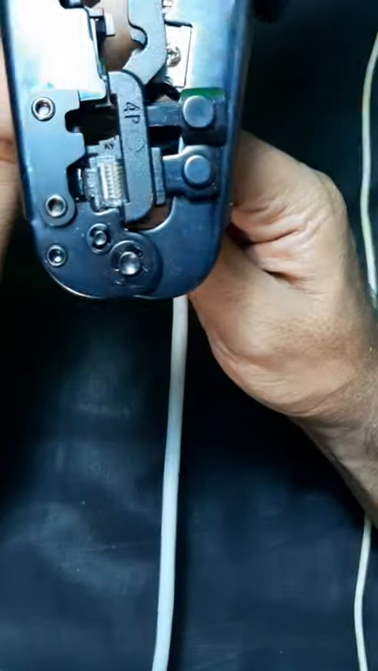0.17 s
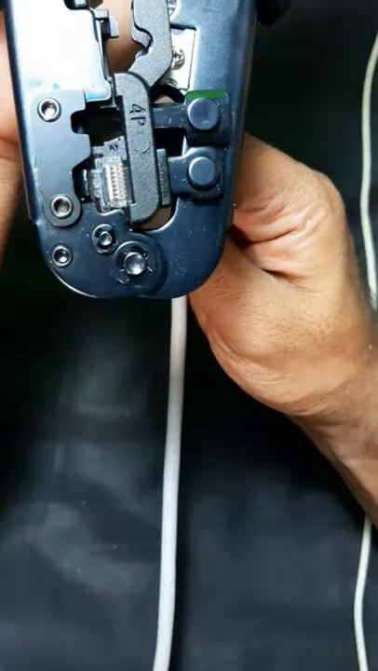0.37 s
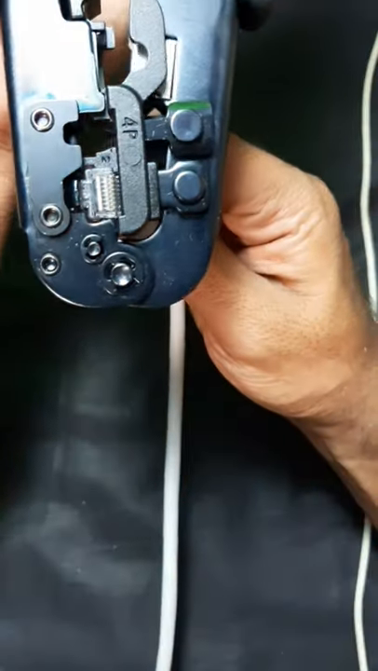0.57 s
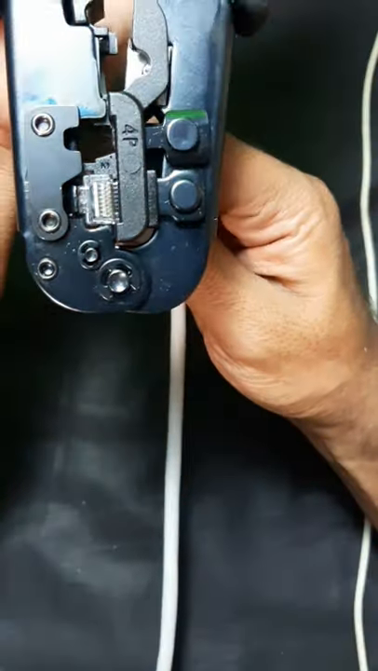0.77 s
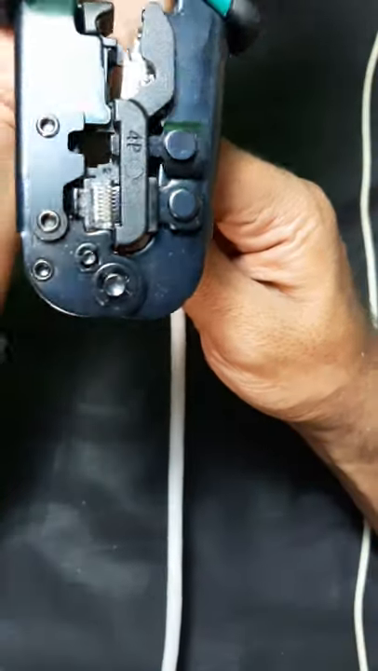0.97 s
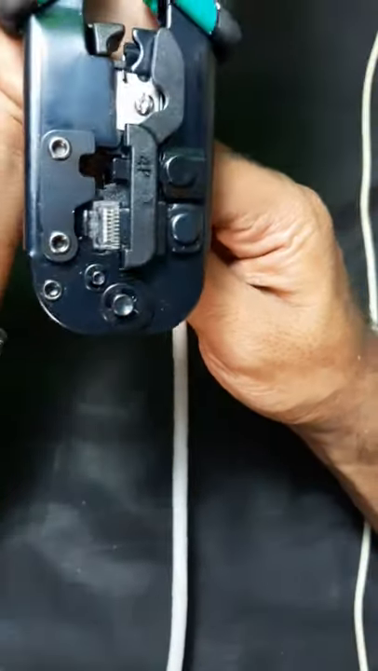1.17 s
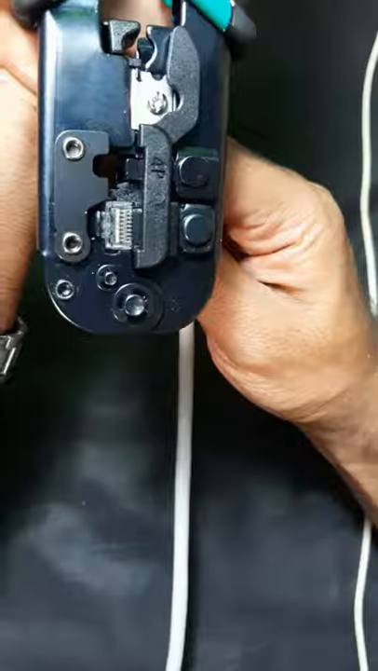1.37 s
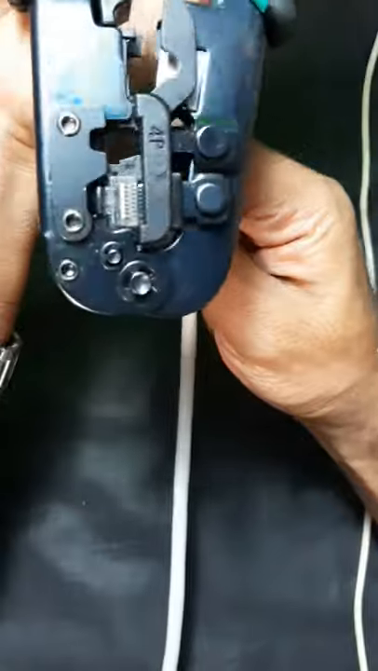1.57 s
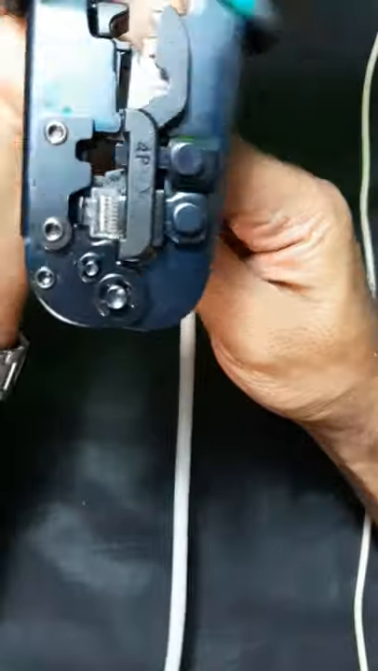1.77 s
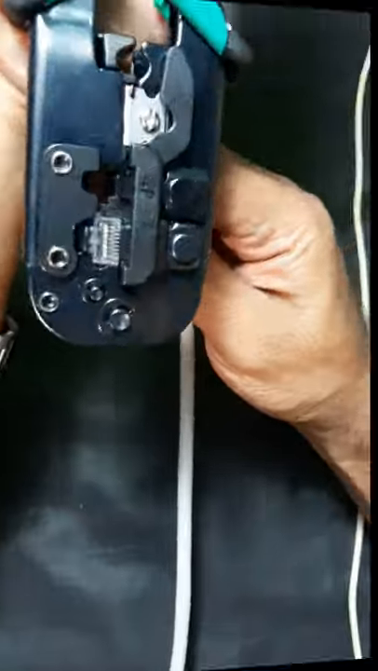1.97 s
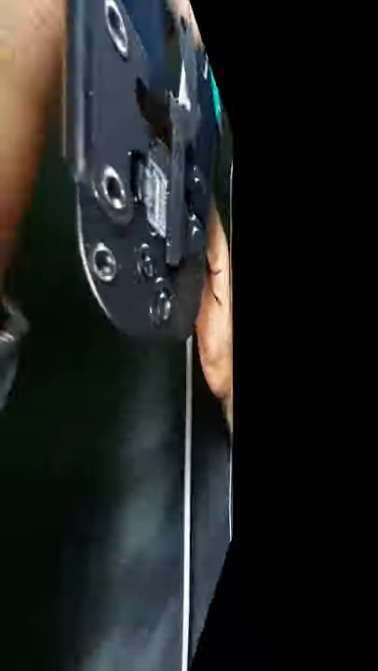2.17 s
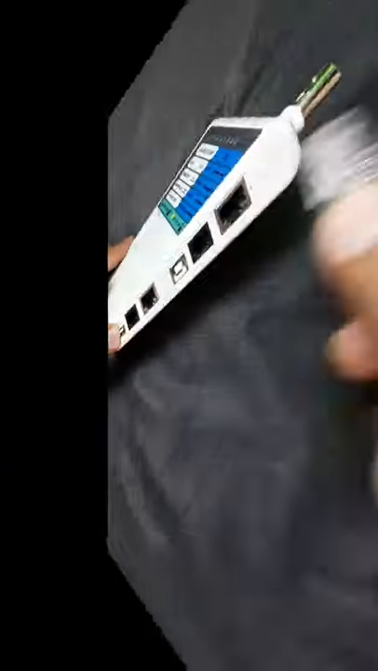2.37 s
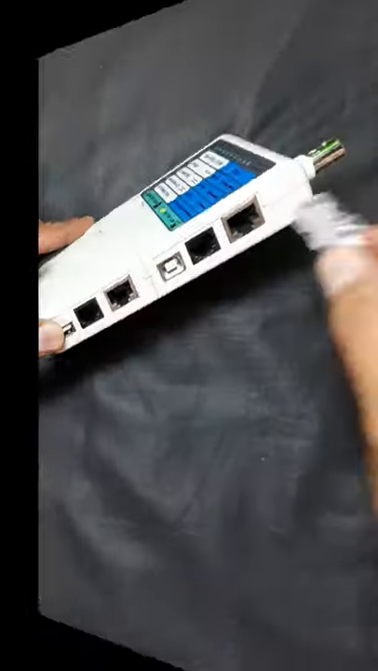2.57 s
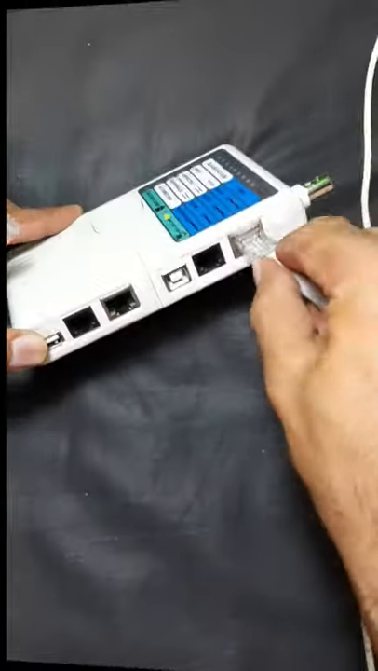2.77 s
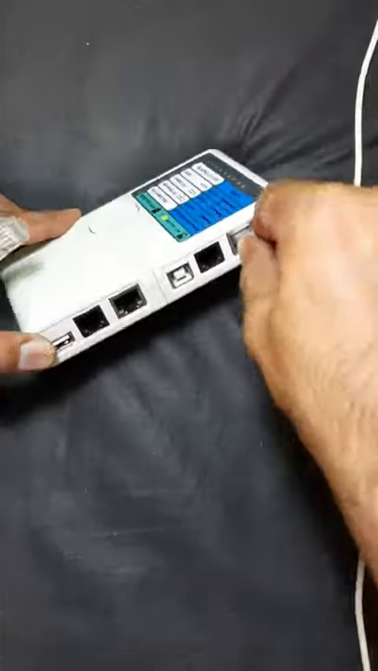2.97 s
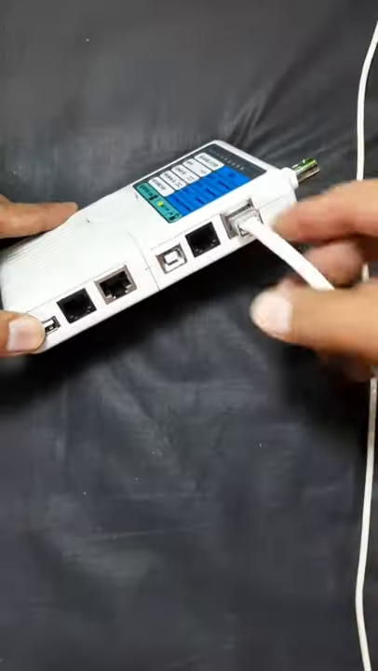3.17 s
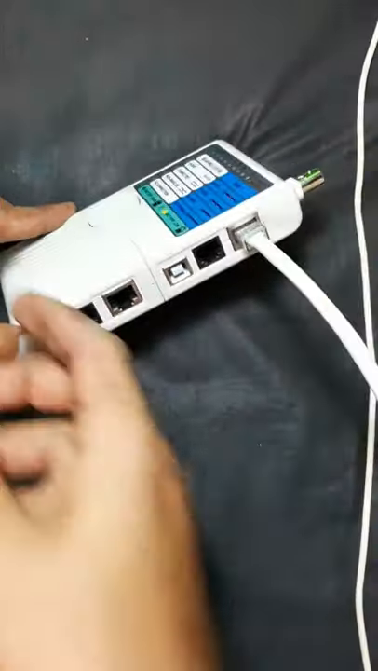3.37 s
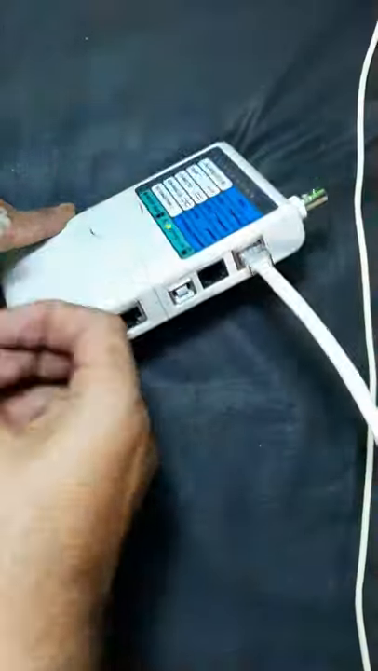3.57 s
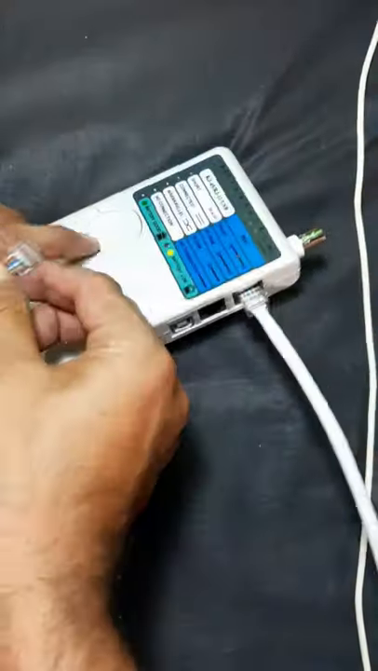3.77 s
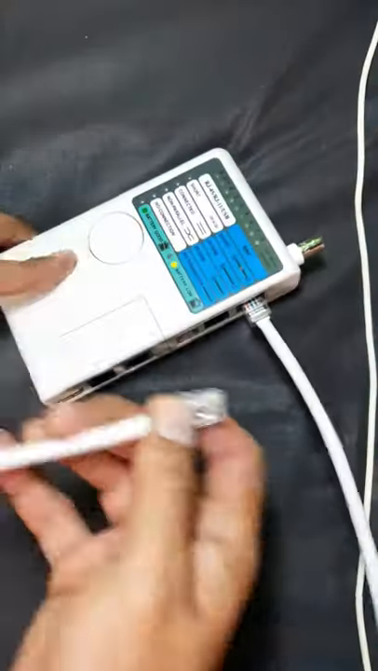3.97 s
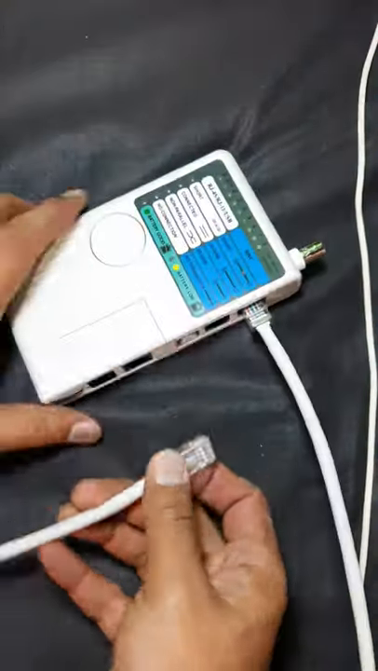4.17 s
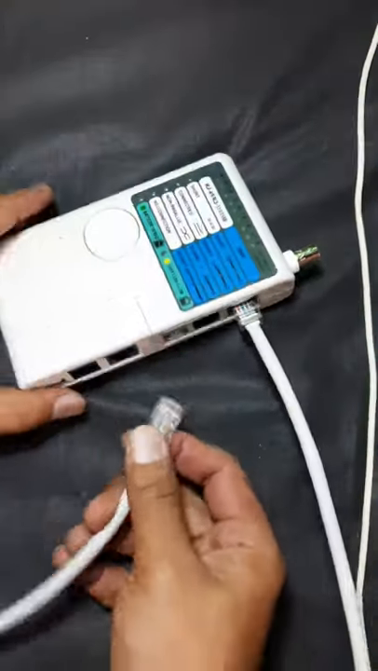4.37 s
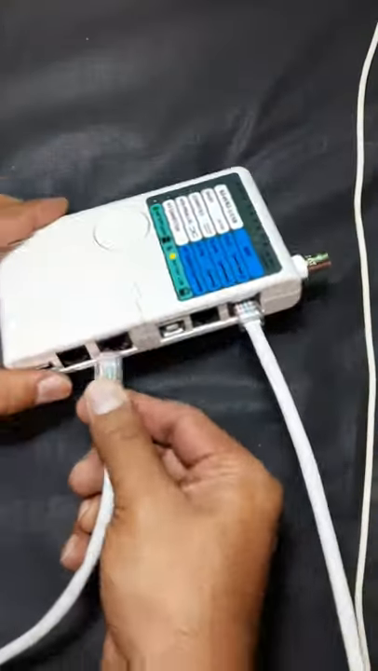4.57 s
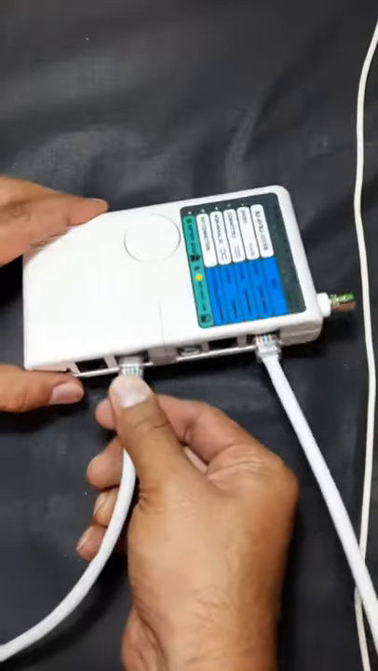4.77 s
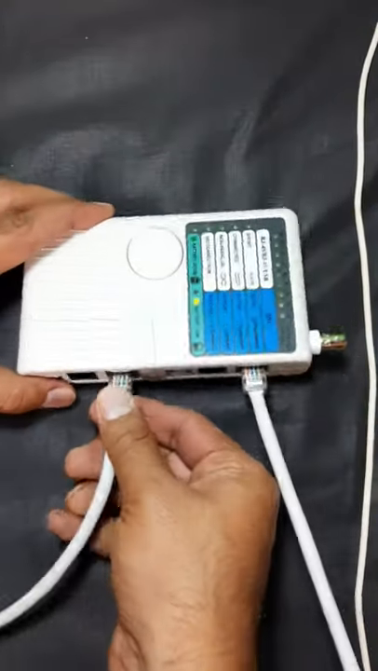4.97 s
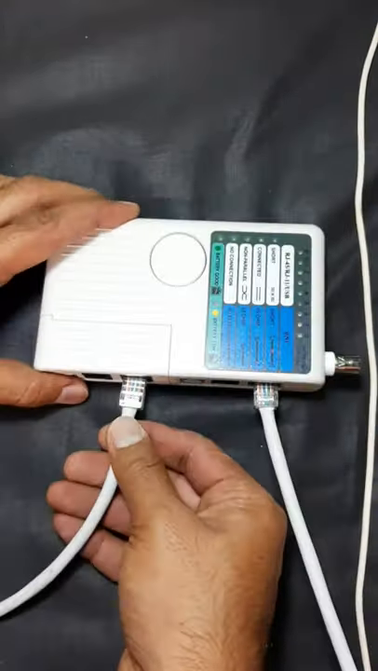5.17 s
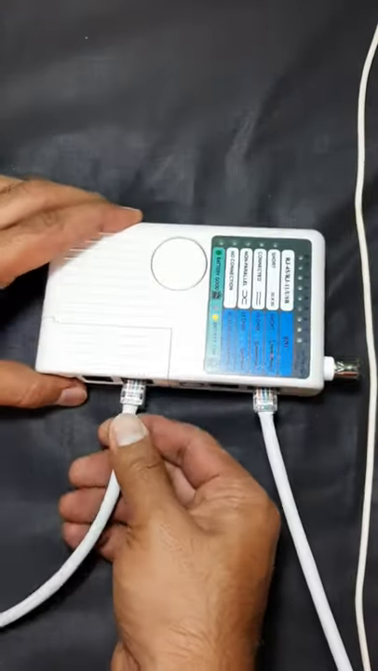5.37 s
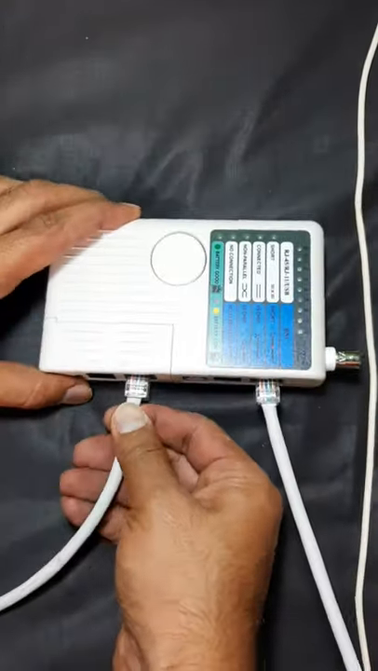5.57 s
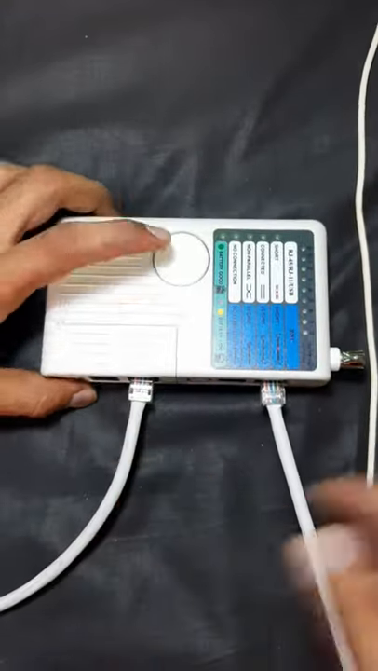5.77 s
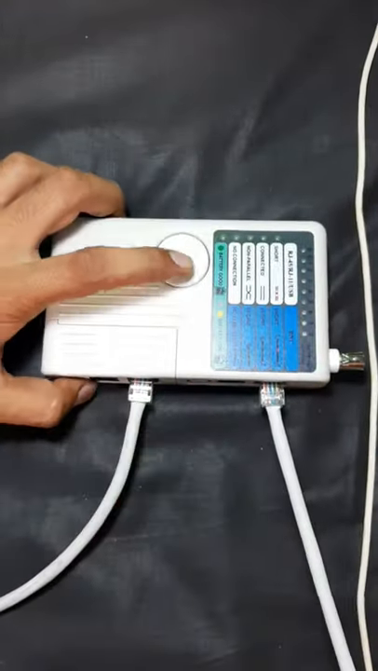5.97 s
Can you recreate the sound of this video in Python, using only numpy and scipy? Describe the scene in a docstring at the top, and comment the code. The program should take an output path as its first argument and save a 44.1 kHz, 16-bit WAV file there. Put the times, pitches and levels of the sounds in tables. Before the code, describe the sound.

Close up in a small room, an unsteady low fan hum and soft draught run underneath. A steel ratchet tool is squeezed and released with bright, crisp clicks in three tight bursts and faint gritty rubs. Everything fades briefly to silence, then returns with plastic plugs snapping into a hollow tester, light sliding and tiny taps, ending on one small click as the fan grows quieter.

```python
"""Crimping a network plug, then testing it

A fan hums unevenly and grows quieter towards the end: wavering tones over coloured noise.
A ratchet crimping tool is squeezed and let go: noise bursts ring steel modes. The sound fades briefly to
silence and back; plugs slide into a plastic tester and latch, ringing plastic modes. Rubs are swelling
friction noise, thuds are damped sines; a small room answers the clicks and thuds."""
import sys
import numpy as np
from scipy import signal
from scipy.fft import rfft, irfft
from scipy.io import wavfile
from scipy.ndimage import uniform_filter1d

SR = 44100
rng = np.random.default_rng(int(sys.argv[2]) if len(sys.argv) > 2 else 0)


def dump(signal):
    """Clip the signal to [-1, 1] and save it as 16-bit WAV at the path in sys.argv[1]."""
    limited = np.clip(np.atleast_2d(signal).T, -1, 1)
    pcm = np.round(limited * 32767).astype(np.int16)
    wavfile.write(sys.argv[1], SR, pcm)


N = 265923
TIME = np.arange(N) / SR
SILENT_S = 2.3404  # middle of the fade; tool before, tester after


def amp(db):
    """Decibels to gain."""
    return 10 ** (np.asarray(db) / 20)


def unit(x):
    """Scales to an rms of one."""
    return x / np.sqrt(np.mean(x ** 2) + 1e-24)


def unit_blow(x):
    """Scales each channel to the energy of 10 ms at an rms of one."""
    energy = (x ** 2).sum(-1, keepdims=True)
    return x / np.sqrt(energy / (SR / 100))


def read(points, hz):
    """Reads a table along a logarithmic frequency axis."""
    point_hz, value = np.transpose(points)
    return np.interp(np.log(hz + 1), np.log(point_hz), value)


def add(mix, start_s, sound):
    """Adds a stereo sound at a time."""
    part = mix[:, max(round(start_s * SR), 0):][:, :sound.shape[1]]
    part += sound[:, :part.shape[1]]


def band(x, lo_hz, hi_hz, order=3):
    """Causal Butterworth band-pass."""
    sos = signal.butter(order, [lo_hz, min(hi_hz, SR * .48)], "band", fs=SR, output="sos")
    return signal.sosfilt(sos, x)


def wander(rate_hz):
    """Low-passed noise of unit rms."""
    hz = np.fft.rfftfreq(N, 1 / SR)
    spectrum = rfft(rng.standard_normal(N)) / (1 + (hz / rate_hz) ** 4)
    return unit(irfft(spectrum, N))


def panned(pan_db):
    """Left and right gains of constant power, pan_db apart."""
    return unit(amp([[pan_db / 2], [-pan_db / 2]]))


def ring(x, modes):
    """Direct sound plus damped modes (pitch_hz, width_hz, gain_db), which radiate little below their pitch."""
    hz = np.fft.rfftfreq(x.shape[-1], 1 / SR)
    body = 1
    for pitch_hz, width_hz, gain_db in modes:
        radiation = np.minimum(hz / pitch_hz, 1) ** 2
        resonance = 1 / (1 + 2j * (hz - pitch_hz) / width_hz)
        body = body + amp(gain_db) * radiation * resonance
    return irfft(rfft(x) * body, x.shape[-1])


# fan throb pitch before waver: start_s, pitch_hz
THROB_PITCH = [(0, 47.85), (1.1, 45.81), (1.45, 50.08), (2.05, 45.7), (2.6, 52.08), (3.3, 50.2),
               (3.7, 45.25), (4.6, 47.4), (5.2, 44.16), (5.7, 47.98)]
# throb before trim and flutter, one list for the tool and one for the tester: start_s, level_db
THROB_CURVES = [
    [(0.0, -49), (0.05, -37.5), (0.15, -56), (0.23, -51.5), (0.58, -42.5), (0.62, -60), (0.73, -39),
     (0.89, -58), (1.02, -40.5), (1.11, -65), (1.18, -46.5), (1.84, -55), (1.87, -71), (1.98, -42),
     (2.04, -51.5), (2.15, -60.5)],
    [(2.6, -62.5), (3.04, -40), (3.22, -54), (3.61, -45.5), (3.69, -57), (3.86, -43.5), (4.02, -61),
     (4.43, -48.5), (4.55, -57), (4.63, -50.5), (5.35, -58), (5.39, -77), (5.51, -54.5), (5.71, -68.5),
     (5.89, -59.5), (6.0, -73)],
]
# its octave, likewise: start_s, level_db
OCTAVE_CURVES = [
    [(0.0, -54), (0.11, -47.5), (0.3, -46), (0.33, -58), (0.36, -52), (0.92, -49), (0.95, -49.5),
     (1.04, -43), (1.09, -65), (1.24, -46), (1.33, -59), (2.15, -54)],
    [(2.6, -63.5), (3.11, -54.5), (3.5, -56.5), (3.53, -67.5), (3.57, -44), (3.84, -61.5), (3.86, -54),
     (5.04, -56.5), (5.08, -82), (5.13, -61), (5.96, -71.5), (6.0, -64)],
]


def hum(waver_hz=2.6, flutter_db=2.0, waver_rate_hz=9, flutter_rate_hz=9, pan_db=0.89):
    """Fan blades chop the air: a low tone and its octave, both unsteady in pitch, wavering unevenly in level."""
    throb_trim_db, octave_trim_db = 0, -1
    tones = [(1, THROB_CURVES, throb_trim_db), (2, OCTAVE_CURVES, octave_trim_db)]
    out = np.zeros(N)
    for harmonic, curves, trim_db in tones:
        throb_hz = np.interp(TIME, *np.transpose(THROB_PITCH)) + waver_hz * wander(waver_rate_hz)
        cycles = np.cumsum(harmonic * throb_hz) / SR + rng.random()
        level = uniform_filter1d(amp(np.interp(TIME, *np.concatenate(curves).T)), size=3000)
        level *= amp(trim_db + flutter_db * wander(flutter_rate_hz))
        out += np.sqrt(2) * level * np.sin(2 * np.pi * cycles)
    return out * panned(pan_db)


# correlation between the two microphone ports: pitch_hz, likeness (-1..1)
PORT_LIKENESS = [(60, 1), (130, 0.8), (290, 0.95), (640, 0.33), (1400, -0.5), (5000, 0)]
# left over right: pitch_hz, pan_db
PORT_BALANCE = [(100, 0), (200, -4), (700, 0.5), (1300, -3), (8000, -4), (15000, 0.5)]


def wash(colour):
    """Coloured noise at two ports: alike in the bass, unrelated in the treble."""
    hz = np.fft.rfftfreq(N, 1 / SR)
    a, b = rfft(rng.standard_normal((2, N)))
    same = np.clip(read(PORT_LIKENESS, hz), -1, 1)
    side = amp(read(PORT_BALANCE, hz) / 2)
    ports = np.array([a * side, (same * a + np.sqrt(1 - same ** 2) * b) / side])
    return unit(irfft(ports * amp(read(colour, hz)), N))


# draught at the microphone before the rush and hiss gains: start_s, level_db
DRAUGHT_LEVEL = [(0, -51.5), (0.9, -50.5), (1.055, -48.5), (1.075, -54), (1.55, -56), (2.1, -58),
                 (2.62, -60), (2.98, -50), (3.25, -52), (3.9, -51.5), (4.3, -54.5), (5.05, -56), (5.7, -64),
                 (6.03, -67)]
# relative spectrum of the rush before its band-pass: pitch_hz, tool_db, tester_db
RUSH_COLOUR = [(15, -8.5, -16.5), (31.4, 2, 9), (69.6, 8.5, 7.5), (130, 1, 0), (183, -3, -3.5),
               (234, 2.5, 2.5), (351.7, -1.5, -3), (421, -9, -11), (645, -6, -3.5), (972, -16.5, -16.5),
               (1400, -21.5, -16), (1432, -14, -14), (2210, -23.5, -23), (3460, -51.5, -55)]
# relative spectrum of the hiss: pitch_hz, level_db
THIN_HISS_COLOUR = [(200, -9), (2500, 16.5), (4000, 6.5), (5500, 2), (7600, 1.5), (8300, -22), (9700, -8),
                    (10400, -2.5), (15200, 5), (15800, -23)]


def air(rush_db=4, hiss_db=-41, hiss_share=0.6, flutter_db=1, flutter_rate_hz=6.1, top_hz=4200):
    """The fan's turbulent draught, coloured by where the microphone stands; a thin hiss follows its level."""
    level_db = np.interp(TIME, *np.transpose(DRAUGHT_LEVEL))
    colour = np.array(RUSH_COLOUR)
    at_tool, at_tester = wash(colour[:, :2]), wash(colour[:, ::2])
    rush = band(np.where(TIME < SILENT_S, at_tool, at_tester), 7.6, top_hz, order=2)
    rush *= amp(rush_db + level_db + flutter_db * wander(flutter_rate_hz))
    hiss = wash(THIN_HISS_COLOUR) * amp(hiss_db + hiss_share * level_db)
    return rush + hiss


# decay of the tail: pitch_hz, t60_s
ROOM_DECAY = [(300, 0.21), (2000, 0.37), (8000, 0.1), (15000, 0.12)]


def room(x, early_decay_s=0.0052, early_db=-18, tail_db=-23):
    """Quick reflections from hands and table, then a faint tail whose treble dies first."""
    t = np.arange(SR // 2) / SR
    near, far = rng.standard_normal((2, 2, len(t))) * (t > .002)
    early = near * np.exp(-t / early_decay_s)
    hz, frame_s, z = signal.stft(far, SR, nperseg=256)
    decay = amp(-60 * frame_s / read(ROOM_DECAY, hz)[:, None])
    tail = signal.istft(z * decay, SR, nperseg=256)[1][:, :len(t)]
    response = (amp(early_db) * unit(early) + amp(tail_db) * unit(tail)) / np.sqrt(len(t))
    mono = x.sum(0, keepdims=True) / np.sqrt(2)
    return x + signal.fftconvolve(mono, response, axes=1)[:, :N]


# where the hands work, before each sound's share: start_s, pan_db (left over right)
HAND_PLACE = [(.8, 5.5), (1.06, 16), (1.65, 14), (1.9, 20), (2.2, 22.5), (2.63, -5), (2.99, 0), (3.9, -9),
              (5.47, -6.5)]


def place_db(s):
    """Left-right difference of the hands at a moment, before scaling by each sound's share."""
    return np.interp(s, *np.transpose(HAND_PLACE))


def friction(modes, grain_db):
    """Tiny slips of uneven strength ring an object: the middle and the treble of that sound."""
    slips = rng.standard_normal((2, N)) * amp(grain_db * wander(rate_hz=900))
    rung = ring(slips, modes)
    return unit(band(rung, 1600, 7900, order=5)), unit(band(rung, 10300, 15100, order=6))


# steel tool resonances, nominal: pitch_hz, width_hz, gain_db
STEEL_MODES = [(2350, 120, 9), (2680, 91, 5.5), (3360, 53, 6), (3760, 35, 7), (5030, 220, 9.5),
               (6070, 90, 10), (7060, 110, 8), (7980, 20, 13), (7960, 160, -1), (10670, 300, 19),
               (11850, 500, 23), (12600, 470, 14), (13750, 1000, 17.5), (14420, 570, 19),
               (15030, 400, 18.5)]
# sliding parts and fingers: middle_s, length_s, level_db, ring_hz, ring_width_hz, ring_db, treble_db
RUB_STROKES = [(0.532, 0.18, -71, 10900, 400, 11, -1), (0.603, 0.5, -77.5, 4530, 1200, 13, -5),
               (0.835, 0.068, -65.5, 4600, 1200, 12, 0), (0.999, 0.053, -58.5, 14500, 500, 2, -0.5),
               (1.046, 0.12, -66, 8000, 198.5, 21, 1.5), (1.153, 0.061, -51.5, 6100, 197, 4.5, 0),
               (1.214, 0.096, -69.5, 2030, 300, 12, -8), (1.55, 0.18, -73.5, 5060, 598, 4, -5),
               (1.588, 0.062, -61, 5230, 600, 5, -6.5), (1.624, 0.079, -53.5, 10900, 400, 18, -8),
               (1.816, 0.055, -45.5, 10800, 299, 17, -2.5), (1.843, 0.05, -55, 14330, 500, 6, 3.5),
               (1.94, 0.08, -67, 14150, 500, 7.5, -3), (2.156, 0.088, -70, 7000, 260, -13, -8.5),
               (2.212, 0.11, -52, 14000, 260, 3, -1), (2.487, 0.22, -75, 3900, 1200, 22, -13),
               (2.797, 0.32, -74.5, 3300, 800, 4, 1), (2.912, 0.082, -74, 3160, 180, 24, 4),
               (2.943, 0.036, -58.5, 3200, 198, 28, 2), (3.013, 0.15, -70, 3200, 500, 5, 1.5),
               (3.064, 0.052, -61.5, 3200, 300, 11, -2), (3.122, 0.029, -66, 3150, 250, 22, -7),
               (3.113, 0.38, -73.5, 3140, 600, 7, 2.5), (3.693, .21, -79.5, 3900, 1491, 20.5, -7),
               (3.872, 0.13, -70, 2005, 800, 9, -4), (4.004, 0.17, -67.5, 3300, 1500, 18, 4.5),
               (4.202, 0.37, -73.5, 2800, 1400, 20, 1.5), (4.693, 0.57, -71, 2030, 800, 17.5, -10.5),
               (4.881, 0.14, -65, 3050, 1500, 14.5, 1)]


def rubs(pan_share=.4, steel_damping_db=7):
    """Friction that swells and dies, with one resonance of the part rubbed; steel grates, plastic slides."""
    gripped = [(pitch_hz, width_hz, db - steel_damping_db) for pitch_hz, width_hz, db in STEEL_MODES]
    steel, plastic = friction(gripped, grain_db=6), friction([], grain_db=3.8)
    out = np.zeros((2, N))
    for middle_s, length_s, level_db, ring_hz, ring_width_hz, ring_db, treble_db in RUB_STROKES:
        middle, treble = steel if middle_s < SILENT_S else plastic
        inside = abs(TIME - middle_s) < length_s / 2
        slide = middle[:, inside] + amp(treble_db) * treble[:, inside]
        rung = unit(ring(slide, [(ring_hz, ring_width_hz, ring_db)]))
        stroke = rung * np.hanning(inside.sum())
        gains = amp(level_db) * panned(pan_share * place_db(middle_s))
        add(out, middle_s - length_s / 2, gains * stroke)
    return out


# harder blows, and faint dull bumps in the low noise: start_s, level_db, decay_s, pitch_hz, pan_db
DULL_BUMPS = [(1.0657, -45.5, 0.000068, 800, 30), (1.591, -40, 0.00039, 300, 33),
              (1.5914, -38, 0.0042, 85, 19), (1.8669, -54, 0.00025, 900, 28),
              (2.1988, -34, 0.000046, 860, 33), (2.207, -44.5, 0.00018, 705, 22.5),
              (2.702, -54, 0.0079, 743, 10), (2.718, -51, 0.00088, 642, 0), (2.988, -53, 0.0017, 950, 11),
              (3.581, -54, 0.0044, 661, 6), (3.872, -53.5, 0.00059, 980, 6), (3.969, -56.5, 0.0028, 790, 4),
              (4.053, -56.5, 0.0066, 700, 3), (4.174, -58, 0.0021, 865, -1), (4.555, -59.5, .0008, 850, -4),
              (4.701, -61.5, 0.00054, 950, 2), (5.112, -54.5, 0.0053, 756, 11)]


def thuds(size=2048):
    """A dull, quickly damped push of air: a decaying sine."""
    out, t = np.zeros((2, N)), np.arange(size) / SR
    for start_s, level_db, decay_s, pitch_hz, pan_db in DULL_BUMPS:
        push = np.exp(-t / decay_s) * np.sin(2 * np.pi * pitch_hz * t)
        add(out, start_s, amp(level_db) * panned(pan_db) * unit_blow(push))
    return out


def neutral(x, share=.7):
    """Partly evens out a burst's spectrum, so that its colour comes from the object that it strikes."""
    spectrum = rfft(x)
    return irfft(spectrum / (abs(spectrum) + 1e-12) ** np.clip(share, 0, 1), x.shape[-1])


# share of the hand placement in each band: body, middle, treble, top
BAND_PAN_SHARE = [0.35, 0.18, 0.96, 1.15]


def clicks(rows, modes, lowest_hz, low_width_hz, high_width_hz, grain_db, likeness, size=4096):
    """A crack and uneven chatter ring the object; where each contact lands decides which modes speak."""
    spread_db, detune, lead_s, port_lag_s = 1.5, .006, .002, .0003  # detune is a share of the pitch
    rise_s, crack_db = .0005, -9  # crack relative to the chatter
    bands_hz = [(lowest_hz, 3450), (3500, 8900), (9800, 13000), (13000, 15500)]
    out, t = np.zeros((2, N)), np.arange(size) / SR - lead_s
    for start_s, middle_db, body_db, treble_db, top_db, decay_s, low_hz, low_db, high_hz, high_db in rows:
        near, far, grain = rng.standard_normal((3, size))
        chatter = np.array([near, (likeness * near + far) / np.hypot(likeness, 1)])
        chatter *= amp(grain_db * unit(uniform_filter1d(grain, size=16)))
        envelope = np.exp(np.minimum(t / rise_s, -t / max(decay_s, 1e-4)))
        chatter = neutral(chatter * envelope) * envelope ** .15
        chatter /= np.linalg.norm(chatter, axis=1, keepdims=True)
        chatter[0, round(lead_s * SR)] += amp(crack_db)
        chatter[1, round((lead_s + port_lag_s) * SR)] += amp(crack_db)

        grip = rng.standard_normal((len(modes), 2))
        struck = [(pitch_hz * (1 + detune * a), width_hz, gain_db + spread_db * b)
                  for (pitch_hz, width_hz, gain_db), (a, b) in zip(modes, grip)]
        favoured = [(low_hz, low_width_hz, low_db), (high_hz, high_width_hz, high_db)]
        sound = ring(chatter, struck + favoured)

        bands_db = [body_db, 0, treble_db, top_db]
        for (lo_hz, hi_hz), band_db, share in zip(bands_hz, bands_db, BAND_PAN_SHARE):
            part = unit_blow(band(sound, lo_hz, hi_hz, order=5))
            gains = amp(middle_db + band_db) * panned(share * place_db(start_s))
            add(out, start_s - lead_s - port_lag_s, gains * part)
    return out


# plastic tester resonances, nominal: pitch_hz, width_hz, gain_db
PLASTIC_MODES = [(1514, 250, 22.2), (2160, 300, 10), (5490, 330, 6.8), (6830, 160, 14), (7270, 295, 13.05),
                 (8900, 50, 3.1), (9400, 360, 21), (10850, 407, 9.9), (11800, 400, 5.2), (12400, 580, 17),
                 (13600, 730, 15), (15730, 710, 27)]
# plugs touching and latching; body, treble and top are relative to the middle, decay_s is nominal:
# start_s, middle_db, body_db, treble_db, top_db, decay_s, low_hz, low_db, high_hz, high_db
PLUG_CONTACTS = [(2.6285, -44, -1.5, -7, -9, 0.0039, 3050, 30, 4100, 6.1),
                 (2.635, -66, 9.5, -8, -10, 0.002, 1620, 25, 7700, 12),
                 (2.7018, -58, 9, -13, -24, 0.0051, 2560, 21, 4740, 31),
                 (2.7075, -66.5, 19, -11, -17.0, 0.0017, 1603, 36, 4060, 24),
                 (2.7158, -62.5, 6, -12, -7, 0.0029, 1710, 16, 4900, 33),
                 (2.9884, -37, -7.5, 0, -10, 0.0035, 5080, 17, 8200, 21),
                 (3.8443, -73, 2, -2, -0.5, 0.0032, 2004, 5, 7200, 8),
                 (3.8727, -63.5, 11.5, -7, -8.5, 0.0024, 1920, 15, 4720, 18),
                 (4.177, -79.5, 13, -6, -5, 0.0047, 1915, 15, 3340, 6.3),
                 (4.5541, -74.5, 16.5, -9, -5.5, 0.0035, 2170, 11, 3975, 9.2),
                 (4.6684, -76.5, 18, -6, -8.5, 0.0074, 1970, 29, 5280, 5),
                 (4.6825, -73, 2.5, -11.5, -8, 0.0028, 2020, 11, 5780, 18),
                 (4.6998, -72, 17.5, -16, -17, 0.0024, 1990, 34, 3400, 16),
                 (4.7607, -75, 16.5, -18, -17.5, 0.005, 1980, 22, 3450, 9.7),
                 (5.3653, -69, 8.5, -3, -5.0, 0.00069, 1500, 6.8, 5600, 7),
                 (5.472, -49, 1.5, 6, 8, 0.0015, 1520, 9.2, 6370, 13.6)]


def plugs():
    """Plugs knock and latch in the tester, ringing its plastic."""
    return clicks(PLUG_CONTACTS, PLASTIC_MODES, lowest_hz=1002, low_width_hz=220, high_width_hz=890,
                  grain_db=3.5, likeness=0.072)


# pawl, spring and jaws; same conventions as the plugs:
# start_s, middle_db, body_db, treble_db, top_db, decay_s, low_hz, low_db, high_hz, high_db
TOOL_CONTACTS = [(0.674, -70, -8.5, 2, 11, 0.00072, 2400, 7, 7000, 0),
                 (0.8122, -69.5, 5, 6.5, 4, 0.003, 2377, 8, 6800, -4),
                 (0.9214, -71, -9.5, -6, -1, 0.0072, 2394, 1, 5100, 0.5),
                 (0.9898, -66, -0.5, -1.5, -0.5, 0.0076, 2410, 13.5, 8060, -10.5),
                 (1.0332, -58.5, -1.5, 3, 2, 0.0078, 2380, 10.5, 7300, 6.5),
                 (1.0652, -43.5, -12.5, 4, 14, 0.0013, 1540, 13.5, 5350, 14.5),
                 (1.0698, -60.5, 1.5, 12, 4.5, 0.0017, 2030, 4.5, 8060, 13),
                 (1.105, -39.5, -3.5, -3.5, 11, 0.0011, 2105, 25, 7950, 8),
                 (1.1412, -46.5, 0, -4.5, 10, 0.0043, 2040, 29, 6950, 13.5),
                 (1.1475, -51.5, -4, -3, -3, 0.008, 2090, 15.5, 7200, 7),
                 (1.2098, -59.5, -0.5, -11, 1, 0.0022, 2053, 28.5, 6840, 13),
                 (1.2385, -78, 24.5, -15, -15, 0.0011, 2022, 38.5, 3750, 3),
                 (1.553, -60.5, 4.5, -15, -10, 0.0032, 2050, 19, 5300, 12.5),
                 (1.5632, -66, 7.5, -8, -4.5, 0.0012, 2040, 8.5, 14100, 9.5),
                 (1.5695, -64, 6.5, -5, -3, 0.002, 2360, 3.5, 5230, 10),
                 (1.5762, -62, 1.5, -9.5, -9, 0.0015, 2380, 7, 6200, 18),
                 (1.5902, -50.5, 1.5, 9, 9, 0.0018, 2630, 6.5, 11900, 28),
                 (1.6132, -50.5, -10, -1, 10.5, 0.0005, 3390, 6.5, 13700, 20.5),
                 (1.6149, -39, -16.5, -1.5, 5.5, 0.0026, 2100, 5, 8330, 28.5),
                 (1.619, -46, -19, 7.5, -5, 0.0012, 2340, 9, 5100, 24.5),
                 (1.6385, -59.5, -5, -8, -9, 0.003, 2370, 5, 6400, 16.5),
                 (1.799, -62.5, -1.5, 4, -4, 0.003, 2390, 12.5, 11000, 15.5),
                 (1.8065, -57.5, -13, 1.0, -3.5, 0.003, 2400, 11.5, 5250, 13.5),
                 (1.8134, -53, -4.5, 5.5, 1, 0.0018, 2410, 13, 5650, 12),
                 (1.8203, -43, -6, 3.5, 2, 0.0018, 2495, 17.5, 5350, 13),
                 (1.8678, -43, -4.5, -2.5, 8.5, 0.0023, 2440, 13, 7900, 15),
                 (1.9068, -49.5, -13, 13, 11.5, 0.0007, 3850, 13, 8000, 19.5),
                 (1.9089, -45.5, -9, 5.5, 11.0, 0.00088, 2400, -1, 11800, 24),
                 (1.9645, -61.5, -12, 2, -5, 0.0093, 2405, 4, 5420, 5),
                 (2.18, -64, 10.5, 5, 0.5, 0.0009, 2440, 16, 6960, -3),
                 (2.198, -48, -7.5, 0, 10, 0.0004, 1500, -8, 3400, -3.5),
                 (2.207, -54.5, 7, 14.5, 9.5, 0.0006, 1500, 1, 3890, -4),
                 (2.2215, -46.5, -20, 5, 10, 0.0029, 2470, 1, 7100, -8)]


def tool():
    """Pawl, spring and jaws of the ratchet strike and ring the steel."""
    return clicks(TOOL_CONTACTS, STEEL_MODES, lowest_hz=1210, low_width_hz=85, high_width_hz=310,
                  grain_db=3.5, likeness=0.25)


def scene():
    """Tool and plugs in the room, over the fan."""
    struck = tool() + plugs() + thuds()
    return room(struck) + rubs() + hum() + air()


def record(dry):
    """The brief fade to silence and back, then the band limit."""
    hold_s, fade_out_s, fade_in_s, fade_power = 0.029, 0.26, 0.26, 1.1  # hold_s on each side of the middle
    fade_s = np.where(TIME < SILENT_S, fade_out_s, fade_in_s)
    opening = (abs(TIME - SILENT_S) - hold_s) / fade_s
    faded = dry * np.clip(opening, 0, 1) ** fade_power
    low_pass = signal.firwin(255, 16600, window=("kaiser", 9), fs=SR)  # edge in Hz
    return signal.oaconvolve(faded, low_pass[None], "same")


dry = scene()
out = record(dry)
dump(out)
```